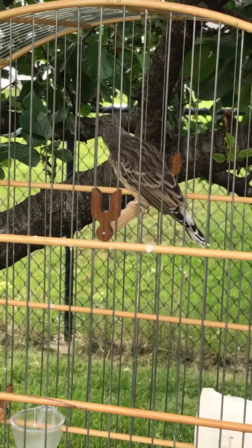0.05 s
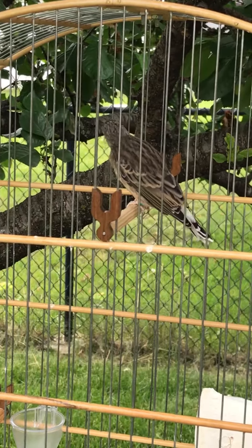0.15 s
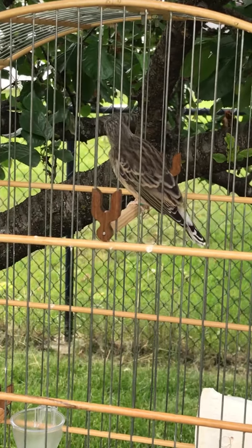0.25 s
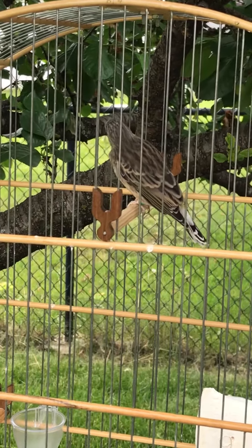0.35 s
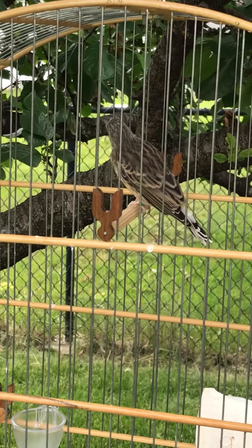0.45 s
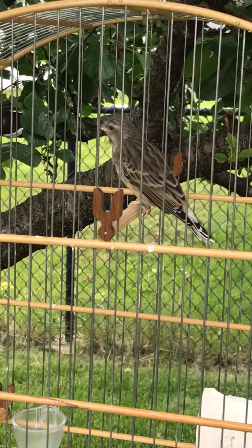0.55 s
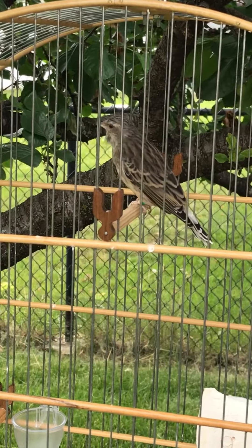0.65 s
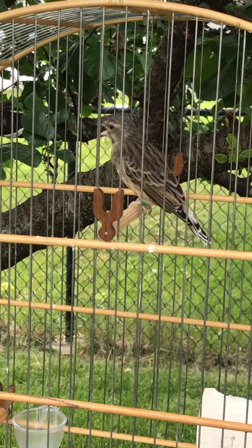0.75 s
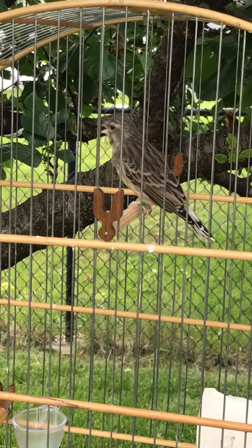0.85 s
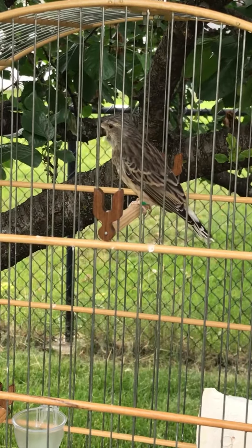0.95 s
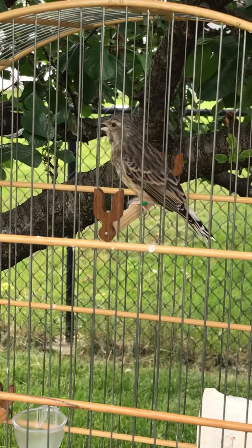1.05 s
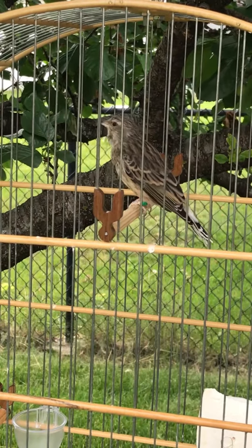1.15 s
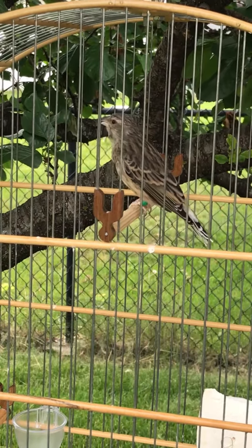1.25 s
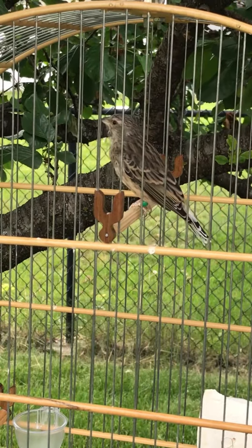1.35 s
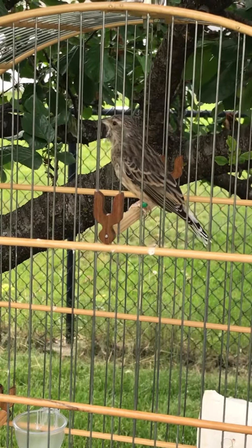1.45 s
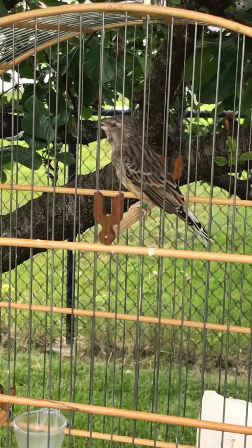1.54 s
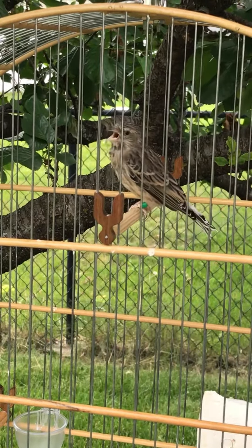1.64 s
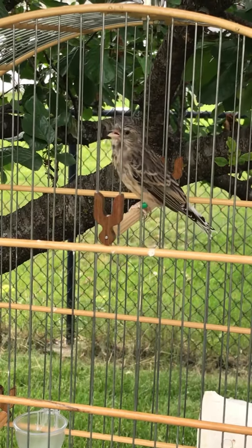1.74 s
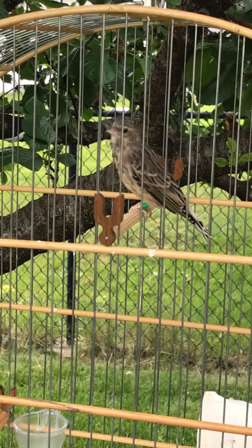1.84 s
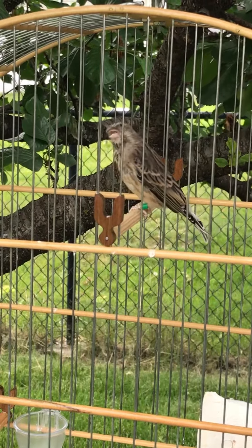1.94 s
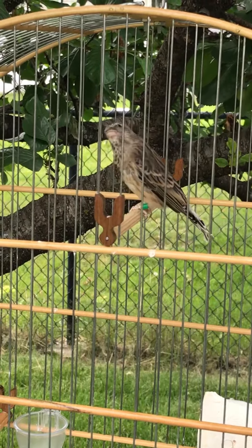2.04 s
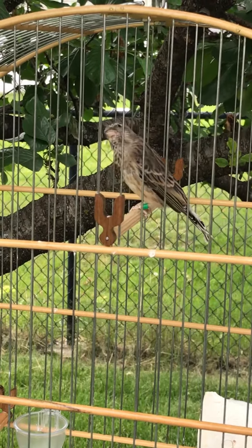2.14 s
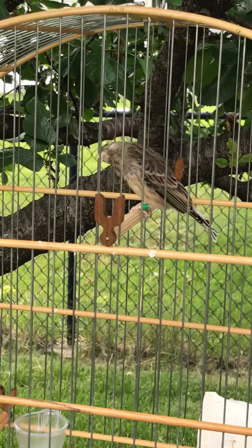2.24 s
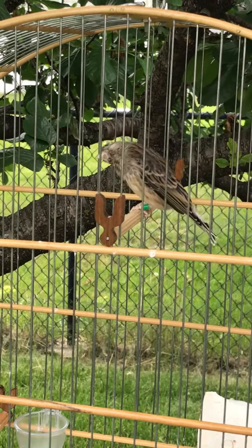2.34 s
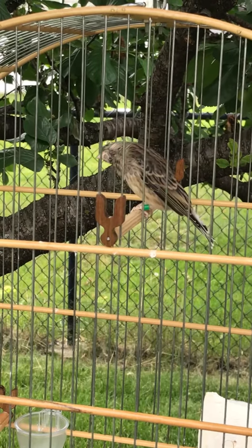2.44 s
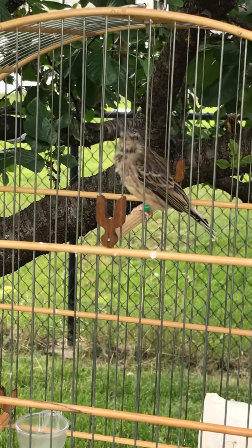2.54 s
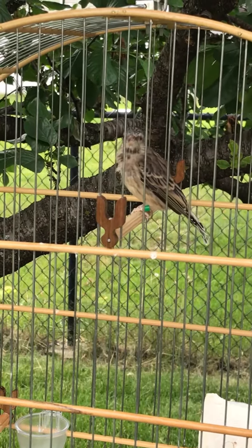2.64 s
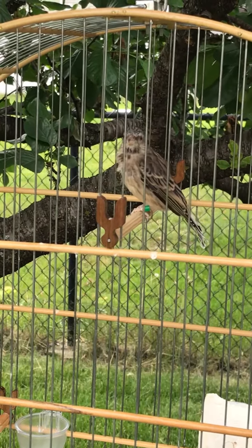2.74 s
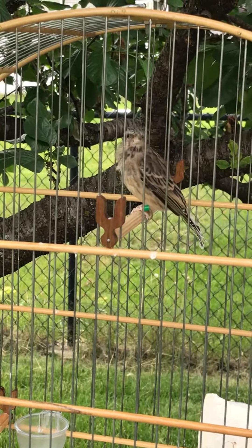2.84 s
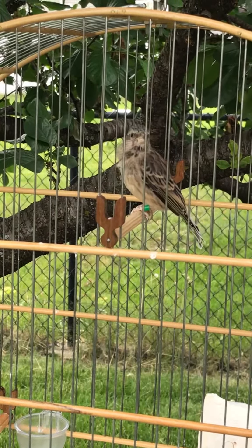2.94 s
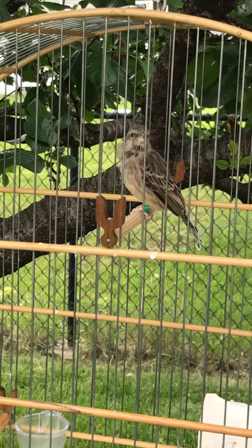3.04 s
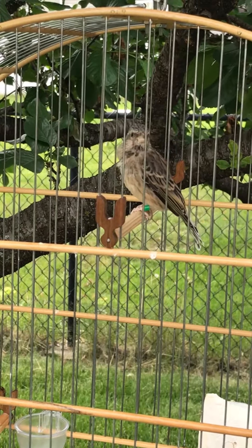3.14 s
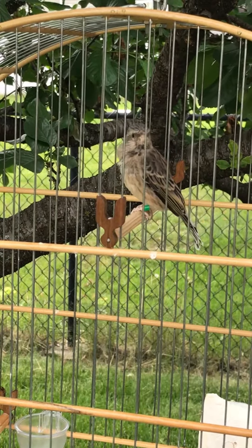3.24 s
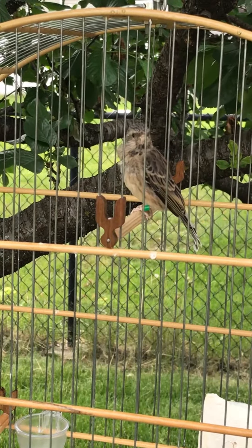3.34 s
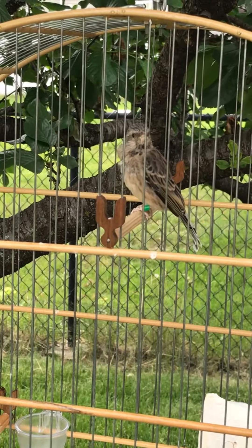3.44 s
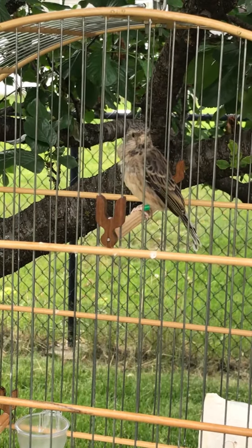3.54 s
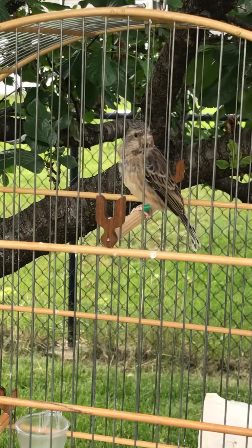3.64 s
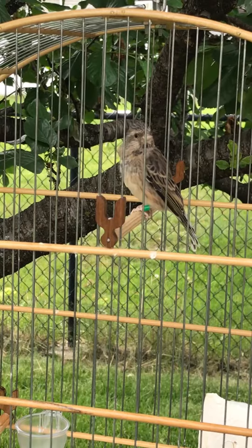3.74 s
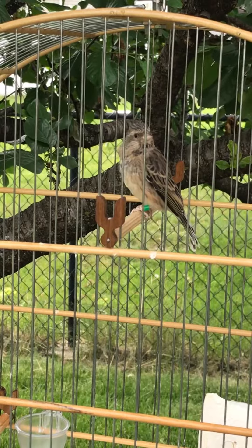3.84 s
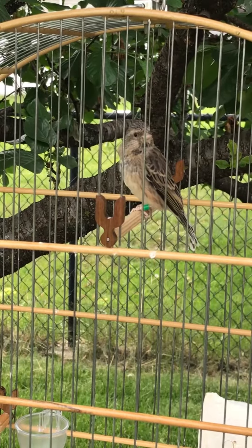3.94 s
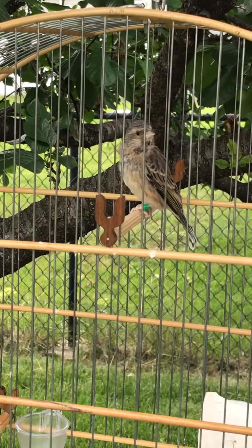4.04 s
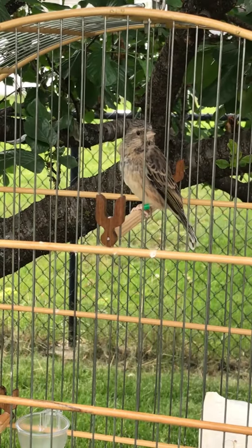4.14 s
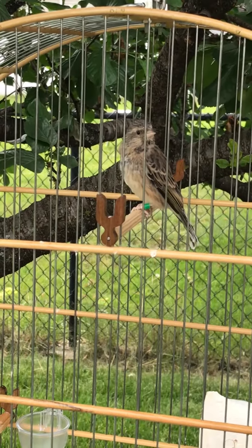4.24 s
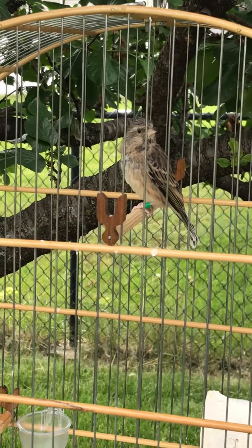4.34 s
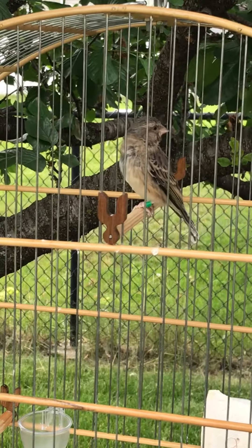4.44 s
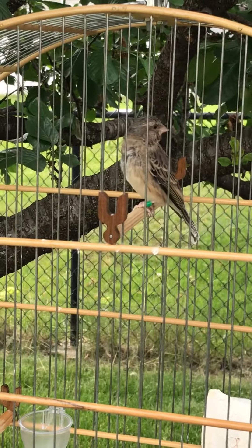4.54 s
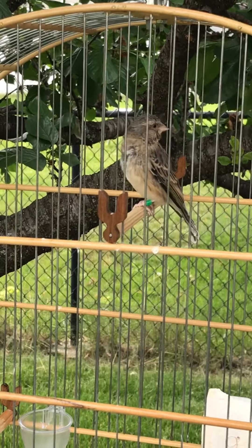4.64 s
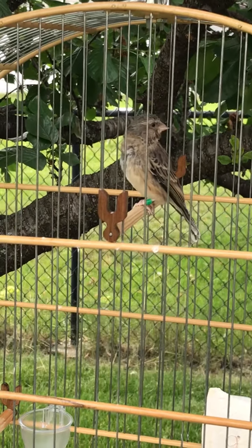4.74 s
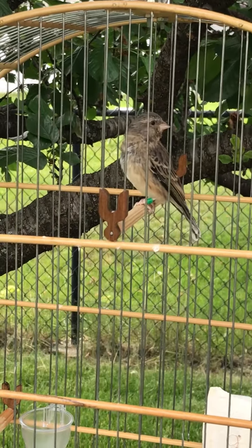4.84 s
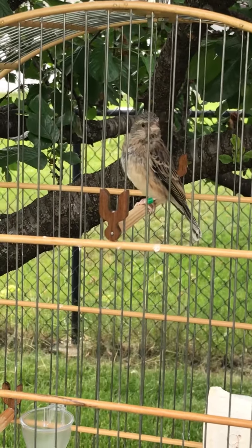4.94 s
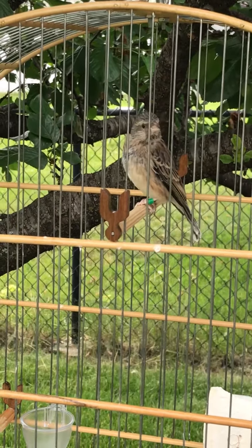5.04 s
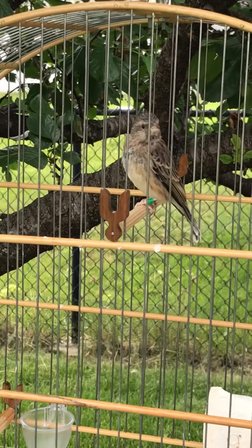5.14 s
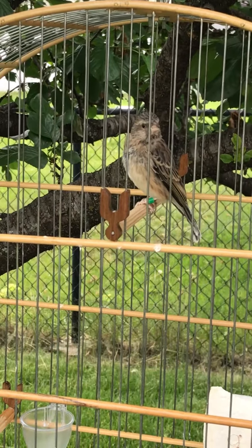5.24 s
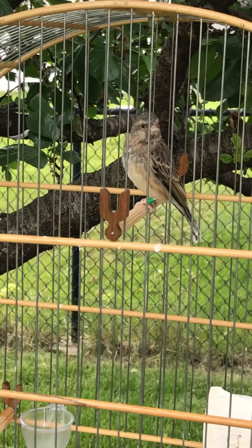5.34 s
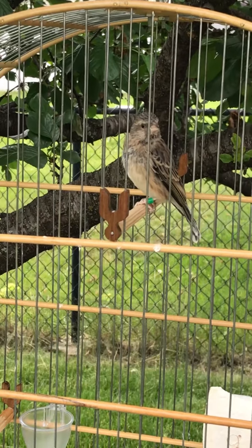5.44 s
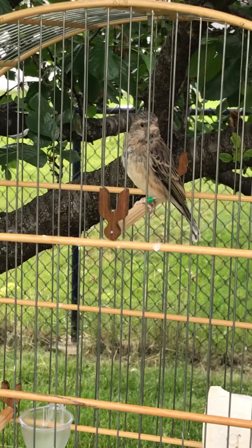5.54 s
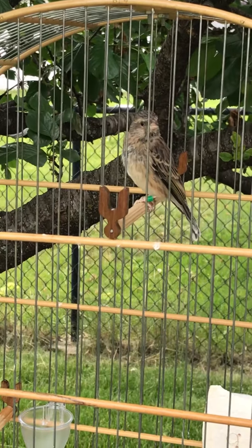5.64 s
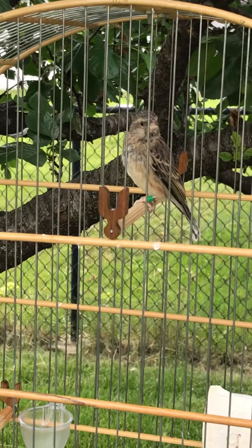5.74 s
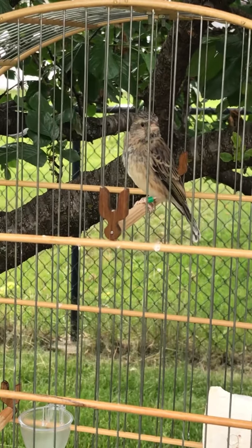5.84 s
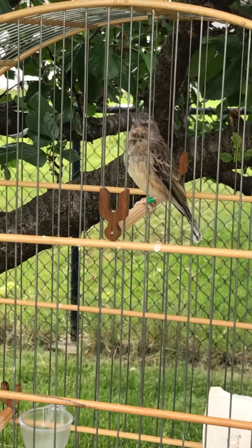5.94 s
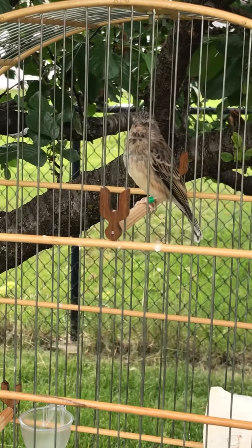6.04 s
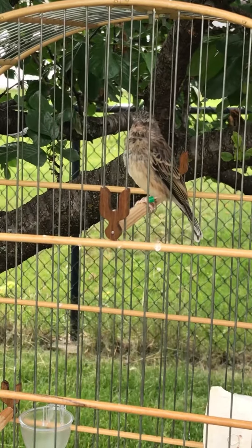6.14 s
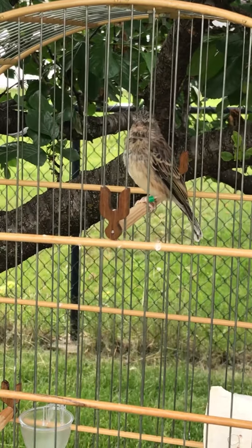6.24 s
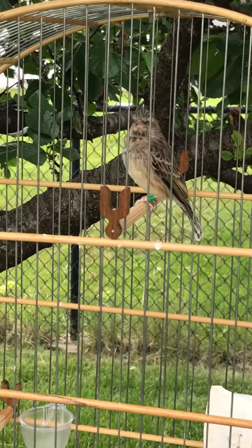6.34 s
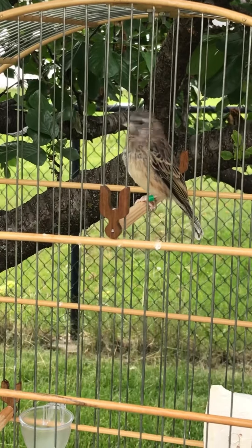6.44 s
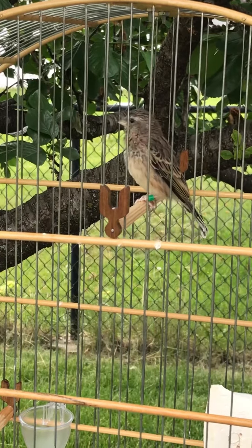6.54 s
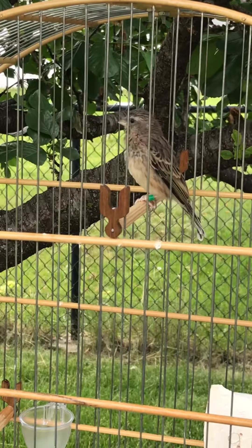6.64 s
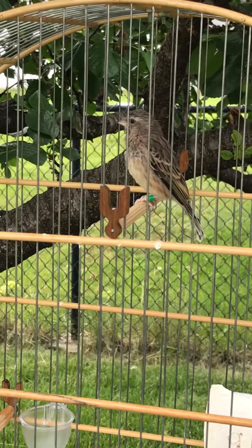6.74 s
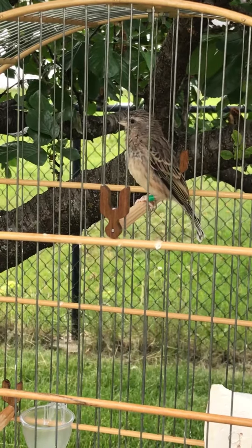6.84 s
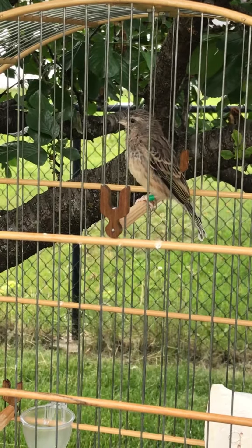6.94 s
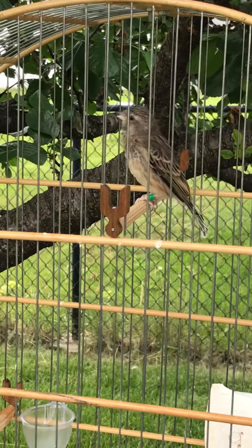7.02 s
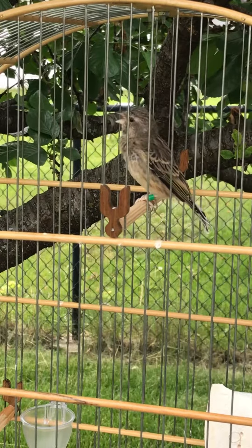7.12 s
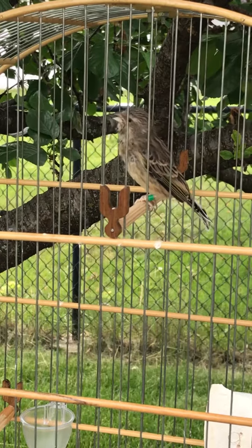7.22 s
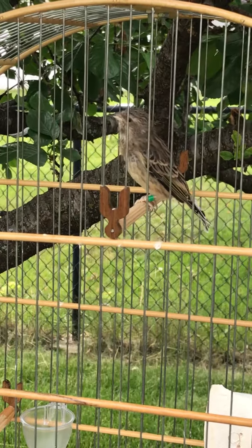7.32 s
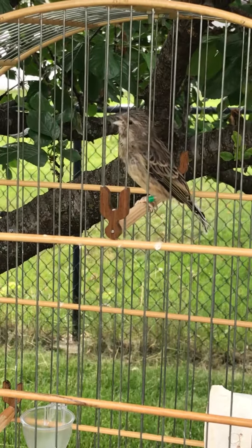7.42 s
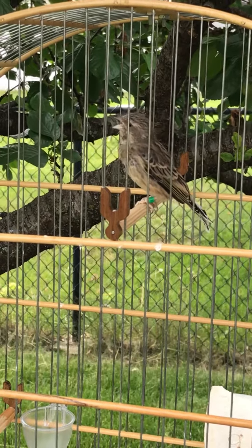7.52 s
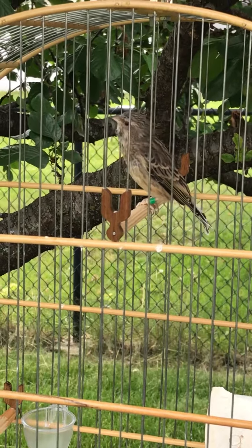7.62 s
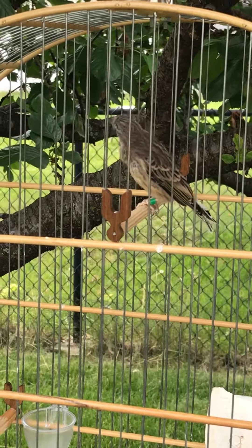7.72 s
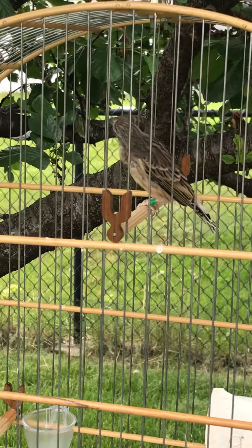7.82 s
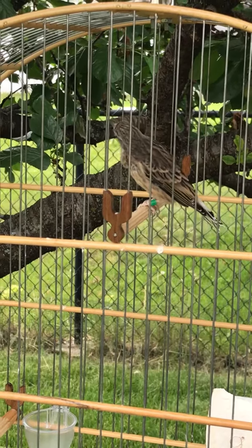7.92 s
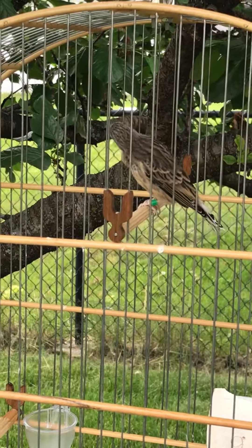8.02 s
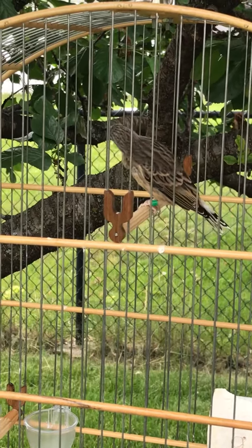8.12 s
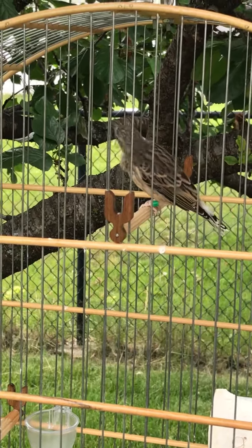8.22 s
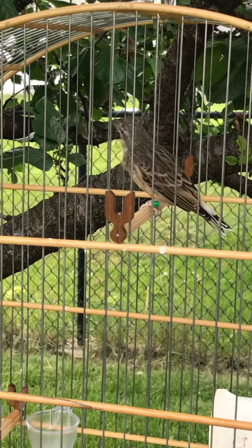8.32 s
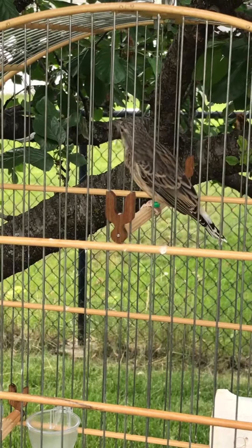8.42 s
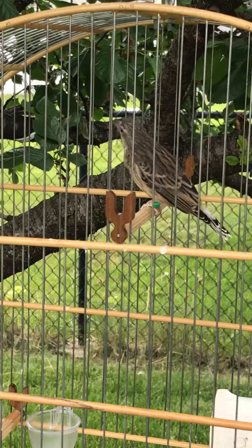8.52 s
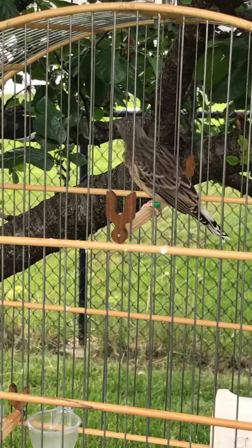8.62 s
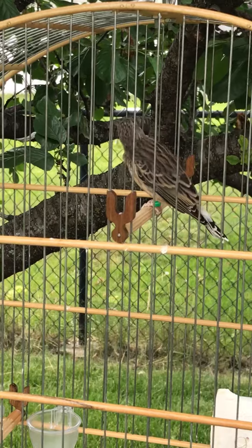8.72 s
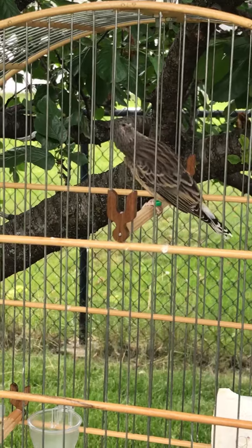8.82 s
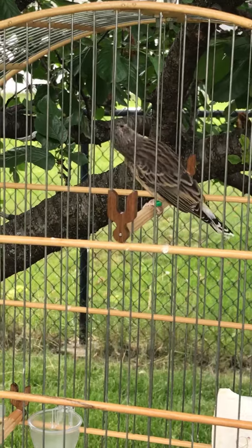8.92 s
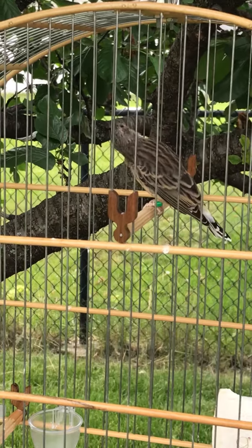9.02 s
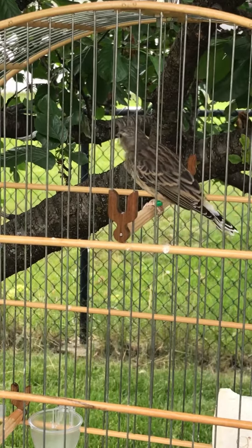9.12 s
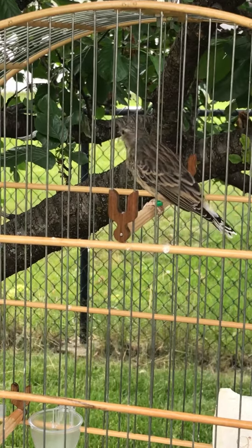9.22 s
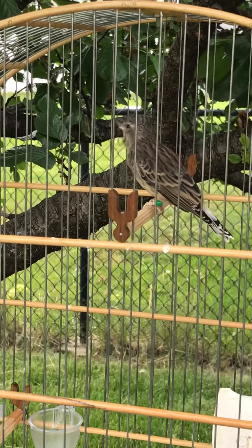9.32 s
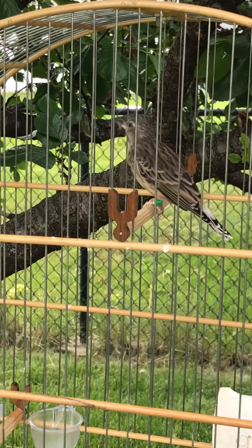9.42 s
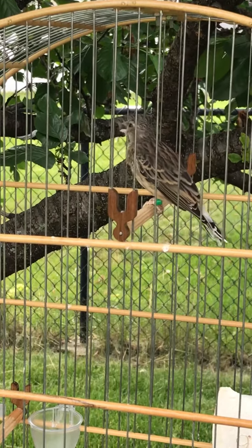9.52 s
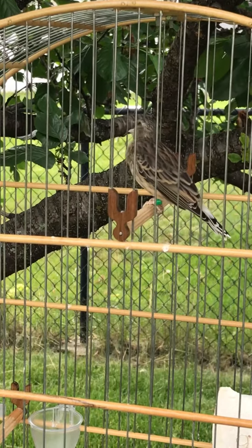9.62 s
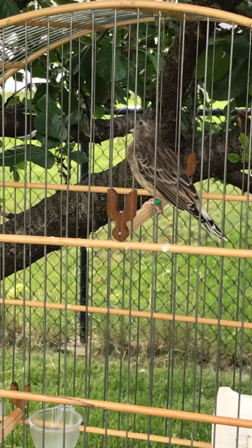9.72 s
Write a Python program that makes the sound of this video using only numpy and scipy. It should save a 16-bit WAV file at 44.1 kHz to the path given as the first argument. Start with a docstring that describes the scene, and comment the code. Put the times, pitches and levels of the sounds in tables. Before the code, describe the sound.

A caged canary close to a phone microphone sings a fast run of clear whistles, steep swoops and a buzzy note for about two seconds. It then falls silent; faint small birds answer from far off and something bumps and rustles softly. A second lively bout follows to the end. Low town rumble, faint hum and thin hiss lie underneath.

```python
"""Caged canary in a garden

A canary close to a phone sings two bouts of quick whistles, swoops and buzzes.
Each note is a near-sine from the syrinx, echoed by close surfaces, cage bars and the yard.
In the pause small birds answer from afar and something rustles; faint chatter, a few thin squeals,
a low hum and town rumble are filtered noise and gliding or steady sines."""
import sys
import numpy as np
from scipy import signal
from scipy.fft import rfft, irfft
from scipy.io import wavfile
from scipy.ndimage import uniform_filter1d

SR = 44100
rng = np.random.default_rng(int(sys.argv[2]) if len(sys.argv) > 2 else 0)


def materialize(psi):
    """Save the field psi as 16-bit PCM at rate SR to the path in sys.argv[1].

    A 1-D psi becomes a single channel; in a 2-D psi each row is a channel.
    """
    bounded = np.clip(np.atleast_2d(psi).T, -1, 1)
    quanta = np.round(bounded * 32767).astype(np.int16)
    wavfile.write(sys.argv[1], SR, quanta)


N = 430857
T = np.arange(N) / SR


def undb(db):
    """Decibels to gain."""
    return 10 ** (np.asarray(db) / 20)


def unit(x):
    """Scale to rms 1."""
    return x / np.sqrt(np.mean(x ** 2) + 1e-20)


def gain_at(hz, points):
    """Read a (Hz, dB) spectrum on a log-frequency axis as gain."""
    point_hz, point_db = np.transpose(points)
    return undb(np.interp(np.log(hz + 1), np.log(point_hz), point_db))


def colour(x, points):
    """Filter by a (Hz, dB) spectrum."""
    return irfft(rfft(x) * gain_at(np.fft.rfftfreq(len(x), 1 / SR), points), len(x))


def band(n, hz, width_hz):
    """Noise in one steep resonance, rms 1."""
    f = np.fft.rfftfreq(n, 1 / SR) + 1
    resonance = 1 / (1 + ((f * f - hz * hz) / (f * width_hz)) ** 2)
    return unit(irfft(rfft(rng.standard_normal(n)) * resonance, n))


def wander(t, rate_hz):
    """Random drift between normal draws, rate_hz per second, spread near 1."""
    steps = (t - t[0]) * rate_hz
    count = int(steps[-1]) + 2
    return np.interp(steps, np.arange(count), rng.standard_normal(count))


def add(out, start_s, x):
    """Mix x in at a time."""
    i = max(int(start_s * SR), 0)
    out[i:i + len(x)] += x[:len(out) - i]


def background(air_db=-53, hum_hz=120, hum_db=-61.5):
    """Town rumble and air as shaped noise that swells slowly, with a wavering mains hum."""
    # Each row: frequency in Hz, relative density in dB per Hz.
    air_spectrum = [(18, -41), (30, -12.5), (64, 3), (115, -1.5), (308, -19), (528, -23.5), (582, -21),
                    (2130, -32.5), (4040, -30.5), (7630, -43.5), (10500, -45), (13600, -75.5),
                    (22000, -120)]
    # Slow swell of the town. Each row: time in seconds, level change in dB.
    swell = [(1.9, 0), (6.9, 2), (7.3, -1.5), (9.5, 0.5)]
    air_level = undb(air_db + np.interp(T, *np.transpose(swell)))
    air = unit(colour(rng.standard_normal(N), air_spectrum)) * air_level
    hum_level = undb(hum_db + 2 * wander(T, 0.96))
    hum = np.sqrt(2) * np.sin(2 * np.pi * hum_hz * T) * hum_level
    return air + hum


def turn(start_s, length_s, from_hz, turning_hz, to_hz, db, power=1.6):
    """Pitch slows down, reverses and speeds up again; power 1 is a sharp V, 2 a round bowl."""
    t = np.arange(0, length_s, 1 / SR)
    before, after = np.abs([from_hz - turning_hz, to_hz - turning_hz]) ** (1 / power)
    away_hz = np.abs(np.linspace(-before, after, len(t))) ** power
    return start_s + t, turning_hz + np.sign(from_hz - turning_hz) * away_hz, db


def slur(start_s, length_s, from_hz, to_hz, bend, db):
    """Tension relaxes exponentially from one pitch to another."""
    t = np.arange(0, length_s, 1 / SR)
    way = np.expm1(-bend * t / length_s) / np.expm1(-bend)
    return start_s + t, from_hz + (to_hz - from_hz) * way, db


def whistle(start_s, length_s, onset_hz, held_hz, end_hz, db, swell_db, settle_s=0.0099):
    """Pitch settles exponentially, then drifts, while the note swells or fades."""
    t = np.arange(0, length_s, 1 / SR)
    drift_hz = (end_hz - held_hz) * t / length_s
    scoop_hz = (onset_hz - held_hz) * np.exp(-t / settle_s)
    return start_s + t, held_hz + drift_hz + scoop_hz, db + swell_db * (t / length_s - .5)


def syllables(moves, legato_s=.005):
    """Chain movements that touch into one breath; each syllable is rows of time, pitch and level."""
    chains = []
    for move in sorted(moves, key=lambda m: m[0][0]):
        rows = np.array(np.broadcast_arrays(*move))
        if chains and rows[0, 0] - chains[-1][0, -1] < legato_s:
            earlier = chains[-1][:, chains[-1][0] < rows[0, 0]]
            chains[-1] = np.hstack([earlier, rows])
        else:
            chains.append(rows)
    return chains


def sing(syllable, jitter=0.0012, shimmer_db=1.17, sweep_shimmer_db=3.0, rasp=.025,
         clear_db=-22, harsh_db=-7, harsh_octaves_per_s=35, rolloff_db=-4, odd_db=3.0):
    """One syrinx syllable: tension sets pitch, the throat level, a fast sweep brings out overtones."""
    # The throat favours notes near 6 kHz. Each row: pitch in Hz, gain in dB.
    throat = [(1000, -46.5), (1500, -39), (2000, -29.5), (2400, -27.5), (2700, -13.5), (3300, -15),
              (4500, -6), (5300, -5.5), (6100, 1), (6600, -7), (7200, -17), (8300, -33)]
    # How well overtones leave the beak. Each row: frequency in Hz, gain in dB.
    beak = [(6000, -8), (8000, -10), (10500, -13), (12500, -7), (14500, 1.5)]
    # Low notes start softly, high ones at once. Each row: first pitch in Hz, attack in seconds.
    attack = [(2800, 0.018), (5200, 0.0077), (6500, 0.0032)]
    # Fast throbs inside notes. Each row: start in seconds, end in seconds, first rate in Hz,
    # last rate in Hz, loudness depth 0-1, pitch swing in Hz.
    buzzes = [(0.761, 0.937, 148, 106.3, .5, 310), (1.569, 1.616, 170, 211, 0.06, 330),
              (8.191, 8.22, 227, 222, 0.2, 380)]
    # muscles limit pitch changes, air sacs limit changes of push
    muscle_s, pressure_s, release_s = 0.004, 0.01, 0.012

    s, move_hz, move_db = syllable
    t = np.arange(s[0], s[-1], 1 / SR)
    hz = uniform_filter1d(np.interp(t, s, move_hz), int(muscle_s * SR), mode="nearest")
    db = uniform_filter1d(np.interp(t, s, move_db), int(pressure_s * SR), mode="nearest")
    octaves_per_s = uniform_filter1d(np.abs(np.gradient(np.log2(hz))) * SR, size=900)
    harshness = np.minimum(octaves_per_s / harsh_octaves_per_s, 1)
    overtone = undb(clear_db + (harsh_db - clear_db) * harshness)

    attack_s = np.interp(hz[0], *np.transpose(attack))
    opening = np.minimum((t - t[0]) / attack_s, (t[-1] - t) / release_s)
    envelope = np.sin(np.pi / 2 * np.clip(opening, 0, 1)) ** 2
    # held notes are smooth, sliding ones unsteady
    unsteady_db = shimmer_db + sweep_shimmer_db * np.minimum(octaves_per_s / 8, 1)
    shimmer = uniform_filter1d(wander(t, 220), size=90)
    size = undb(db + unsteady_db * shimmer) * gain_at(hz, throat) * envelope

    hz = hz * (1 + jitter * wander(t, 500))
    for start_s, end_s, first_hz, last_hz, depth, swing_hz in buzzes:
        # the membranes throb, swinging pitch and loudness at one rate
        inside = np.clip(np.minimum(t - start_s, end_s - t) / muscle_s + .5, 0, 1)
        rate_hz = np.interp(t, [start_s, end_s], [first_hz, last_hz]) * (t > start_s)
        throb = 2 * np.pi * np.cumsum(rate_hz) / SR
        hz = hz + inside * (rasp * hz * wander(t, 1100) - swing_hz * np.sin(throb))
        size = size * (1 - inside * depth * np.cos(throb))

    phase = 2 * np.pi * np.cumsum(hz) / SR
    wave = np.sin(phase)
    for k in range(2, 7):
        below_nyquist = k * hz < SR / 2
        weight = undb(rolloff_db * (k - .5) + odd_db * (k % 2)) * gain_at(k * hz, beak) * below_nyquist
        wave += overtone * weight * np.sin(k * phase)
    return t[0], np.sqrt(2) * size * wave


def canary():
    """All syllables of the song and the strands over them; levels below are those before the throat."""
    # Swoops down and back up, or arches. Each row: start in seconds, length in seconds,
    # from Hz, turning Hz, to Hz, level in dB.
    turn_rows = [ (.05, 0.017, 6700, 5080, 6240, -17), (0.138, 0.054, 4750, 3140, 4470, -15),
                 (0.338, .025, 8120, 3820, 7760, -17), (.605, 0.036, 3130, 1987, 2450, -18.5),
                 (1.572, .033, 5730, 6670, 5880, -13.5), (1.799, 0.059, 3070, 1354, 2160, -15.5),
                 (7.239, 0.022, 4829, 5172, 5000, -29), (7.627, 0.052, 3830, 1980, 3800, -18),
                 (7.865, 0.033, 5880, 3970, 6190, -21), (7.9, 0.046, 6226, 3970, 5540, -16),
                 (7.98, 0.038, 3420, 2197, 3380, -15.5), (8.057, 0.094, 3054, 3506, 3063, -7),
                 (8.185, .031, 5690, 6600, 6100, -16), (8.599, 0.047, 5428, 2770, 4858, -12.5),
                 (8.989, 0.028, 3240, 2680, 4340, -15), (9.08, 0.026, 6944, 4100, 7840, -21),
                 (9.286, 0.087, 1484, 3210, 2389, -15), (9.524, 0.016, 6600, 5410, 6965, -17.5),
                 (9.542, 0.018, 6874, 2712, 5950, -22)]
    # Slides, fast at first if the bend is positive. Each row: start in seconds, length in seconds,
    # from Hz, to Hz, bend (no unit), level in dB.
    slur_rows = [ (0.065, 0.0093, 8250, 4970, 2, -17.5), (.231, 0.051, 2700, 1830, 2, -20.5),
                 (0.365, .012, 7700, 8500, -4, -16.5), (0.375, 0.018, 8500, 6750, -0.2, -10.5),
                 (0.394, 0.14, 6830, 3396, 1.13, -12.5), (0.76, 0.16, 7350, 4104, 1.8, -19),
                 (1.054, 0.039, 5140, 2480, -0.33, -12), (1.098, 0.018, 8300, 2900, 2.5, -18),
                 (1.29, 0.03, 7540, 3040, 2, -18), (1.386, .061, 2754, 1437, 2, -13.5),
                 (1.446, 0.026, 1474, 3060, 4, -28.5), (1.608, 0.0058, 5932, 8300, 0.5, -13.5),
                 (1.614, .14, 7730, 4020, 1.5, -12.5), (1.96, 0.1, 6330, 3036, 4.2, -13.5),
                 (2.101, .02, 3030, 1520, 1, -14), (2.127, 0.032, 2800, 920, 2.2, -12),
                 (7.179, 0.036, 6400, 2127, 1.05, -16.5), (7.209, 0.027, 2160, 4780, 2.5, -19),
                 (7.257, 0.072, 4840, 3130, 0.75, -11.5), (7.686, 0.084, 4310, 2790, 1.5, -9),
                 (7.822, 0.048, 8470, 5890, 2.4, -11.5), (8.219, 0.0072, 6000, 8300, 1, -13),
                 (8.229, .135, 7720, 3967, 1.22, -13.5), (8.398, 0.037, 2050, 3330, 2.5, -23.5),
                 (8.424, 0.053, 3320, 1217, 3.5, -20), (8.641, 0.032, 4720, 3326, 0.3, -14),
                 (8.816, 0.11, 5740, 3963, 0.9, -15.5), (9.011, 0.028, 4538, 2430, 3.5, -17),
                 (9.121, 0.071, 8020, 3473, 0.65, -13)]
    # Scoops onto a held pitch. Each row: start in seconds, length in seconds, onset Hz, held Hz,
    # end Hz, level in dB, swell over the note in dB.
    whistle_rows = [ (0.076, 0.06, 4970, 4793, 4752, -9.5, -1.5), (0.641, 0.083, 2425, 2540, 2510, -10, 3),
                    (0.974, 0.052, 2816, 2743, 2696, -11, 4.5), (1.157, 0.091, 2657, 2910, 2814, -12, 3),
                    (1.469, 0.071, 2970, 3186, 3171, -8, -0.5), (1.848, 0.051, 2166, 2533, 2700, -11.5, 3),
                    (7.023, 0.075, 3125, 5156, 5057, -16.5, 8), (7.119, 0.058, 5552, 6940, 6395, -15.5, 0),
                    (7.391, 0.087, 3330, 4940, 4644, -14.5, 0.5),
                    (7.492, 0.088, 5490, 6540, 6296, -15.5, -9), (8.478, 0.081, 1193, 2285, 2560, -13.5, 8),
                    (8.71, 0.098, 5710, 6420, 5797, -14.5, 4.5),
                    (9.193, 0.047, 3490, 4700, 4837, -15.5, -2.5),
                    (9.563, 0.17, 6080, 6605, 7660, -16, 0.5)]
    # Turns sounding over the lead: first a loud second overtone of the dip near 1.8 s, then
    # second-voice strands. Each row: start in seconds, length in seconds, from Hz, turning Hz,
    # to Hz, level in dB.
    strand_rows = [(1.82, 0.045, 3700, 2680, 3820, -34), (1.832, 0.041, 1895, 3290, 3142, -28),
                   (9.337, 0.077, 3226, 3370, 2250, -15)]
    lead = [turn(*row) for row in turn_rows]
    lead += [slur(*row) for row in slur_rows]
    lead += [whistle(*row) for row in whistle_rows]
    strands = [np.array(np.broadcast_arrays(*turn(*row))) for row in strand_rows]
    out = np.zeros(N)
    for syllable in syllables(lead) + strands:
        add(out, *sing(syllable))
    return out


def scatter(x, t60_s, onset_s, dull=True):
    """Diffuse echo as decaying noise: dull from leaves, fence and walls, bright from the cage bars."""
    # Colour of the yard's echo. Each row: frequency in Hz, gain in dB.
    yard_spectrum = [(3000, -6), (4300, -8.5), (6400, -10), (7000, -14.5), (9000, -8.5)]
    t = T[:SR]
    noise = rng.standard_normal(SR)
    if dull:
        noise = colour(noise, yard_spectrum)
    tail = noise * undb(-60 * t / t60_s) * (1 - np.exp(-t / onset_s))
    return signal.fftconvolve(x, tail / np.sqrt(np.sum(tail ** 2)))[:N]


def garden(x, cage_db=-16, yard_db=-29):
    """Close echoes beat against each sweep; the bars scatter the treble and a faint long tail follows."""
    # Close reflections. Each row: delay in seconds, level in dB.
    echo_rows = [(.0017, -27.5), (.0042, -13.5), (.0083, -17.5)]
    close = sum(undb(db) * np.interp(T - delay_s, T, x, left=0) for delay_s, db in echo_rows)
    # thin bars reflect short waves better than long ones
    cage = scatter(np.gradient(x) * 2, t60_s=.09, onset_s=.002, dull=False)
    yard = scatter(x, t60_s=0.54, onset_s=0.0033)
    return x + close + undb(cage_db) * cage + undb(yard_db) * yard


def chirp(start_s, end_s, from_hz, to_hz, flutter, db):
    """A distant slur: clear with little flutter, a broad rasp with much."""
    t = np.arange(start_s, end_s, 1 / SR)
    hz = np.linspace(from_hz, to_hz, len(t)) * (1 + flutter * wander(t, 400))
    size = signal.windows.tukey(len(t), .5) * undb(3 * wander(t, 40))
    return undb(db) * unit(size * np.sin(2 * np.pi * np.cumsum(hz) / SR))


def far_calls(chatter_db=-82, count=90):
    """Small birds over faint chatter, and a few thin squeals, blurred by distance."""
    # Distant birds. Each row: start in seconds, end in seconds, start Hz, end Hz,
    # flutter as share of pitch, level in dB before the blur and final gain.
    bird_rows = [(2.622, 3.096, 6020, 5650, 0.05, -74), (3.15, 3.85, 5100, 4700, .08, -73),
                 (4.042, 4.32, 5900, 6510, 0.037, -64.5), (4.583, 4.76, 4320, 4180, .015, -66),
                 (4.68, 4.82, 3900, 3300, .05, -69), (4.83, 5.02, 3100, 3000, .01, -72),
                 (5.029, 5.201, 4940, 6280, .05, -63), (5.138, 5.25, 5390, 4960, .13, -62.5),
                 (5.749, 5.945, 5930, 5670, 0.043, -63.5), (5.9, 6.148, 4500, 4180, 0.013, -71),
                 (6.697, 6.978, 4040, 3860, .02, -70), (6.7, 7.03, 5250, 5450, .035, -70),
                 (4.04, 4.25, 1130, 1290, .04, -72)]
    # Faint, thin squeals far away. Columns and units as for the birds.
    squeal_rows = [(8.69, 8.98, 1735, 1720, .003, -72.5), (9.19, 9.3, 1763, 1715, 0.0024, -66),
                   (9.15, 9.5, 860, 880, .012, -71)]
    out = np.zeros(N)
    for row in [*bird_rows, *squeal_rows]:
        add(out, row[0], chirp(*row))
    for k, (when, pitch, slope) in enumerate(rng.random((count, 3))):
        start_s = (k + when) / count * T[-1]
        from_hz = 3000 * 2 ** pitch
        to_hz = from_hz * 2 ** (.3 * (.5 - slope))
        add(out, start_s, chirp(start_s, start_s + .16, from_hz, to_hz, .015, chatter_db))
    return .7 * (out + scatter(out, t60_s=.5, onset_s=.003))


def rustles():
    """Short swells of noise, dull for bumps and bright for rustles."""
    # Each row: start in seconds, length in seconds, centre in Hz, width in Hz,
    # level in dB before the fades.
    rustle_rows = [(2.13, .14, 219, 540, -55), (2.878, .1, 297, 890, -57.5), (6.241, .11, 398, 700, -53),
                   (6.246, 0.15, 181, 150, -52), (6.3, .035, 3230, 1400, -53.5),
                   (6.371, 0.051, 3400, 2200, -53.5)]
    out = np.zeros(N)
    for start_s, length_s, hz, width_hz, db in rustle_rows:
        n = int(length_s * SR)
        add(out, start_s, undb(db) * band(n, hz, width_hz) * signal.windows.tukey(n, .5))
    return out


def scene():
    """The canary in front, the garden behind."""
    return (background() + garden(canary()) + far_calls() + rustles())[None]


def record(dry, whistle_db=-73, hiss_db=-76, low_cut_hz=42, top_hz=16100):
    """The phone thins the deepest bass, adds a thin high whistle and hiss, and cuts the top."""
    low_cut = signal.butter(2, low_cut_hz, "highpass", fs=SR, output="sos")
    thinned = signal.sosfilt(low_cut, dry)
    hiss = undb(whistle_db) * band(N, 12000, 330) + undb(hiss_db) * band(N, 13000, 4500)
    top_cut = signal.ellip(10, .2, 80, top_hz, fs=SR, output="sos")
    return signal.sosfilt(top_cut, thinned + hiss)


dry = scene()
out = record(dry)
materialize(out)
```